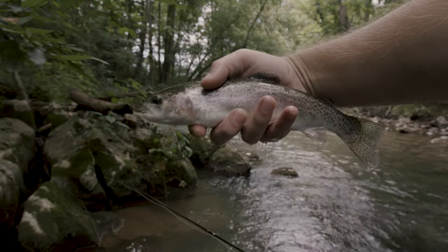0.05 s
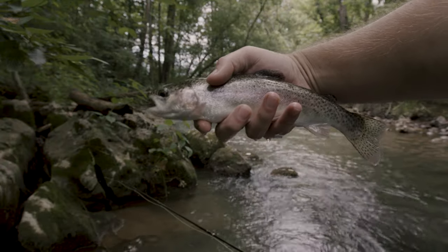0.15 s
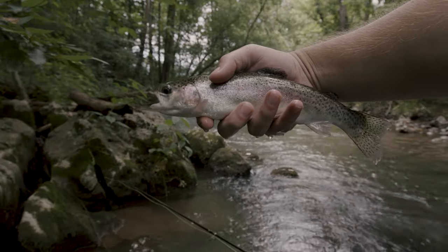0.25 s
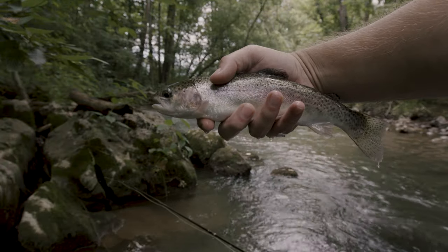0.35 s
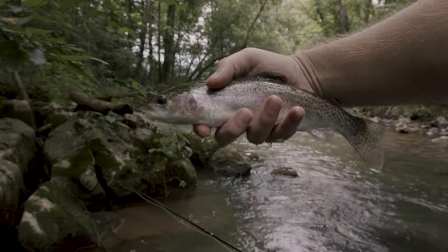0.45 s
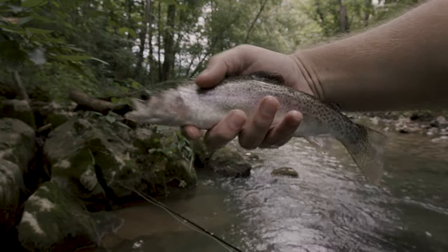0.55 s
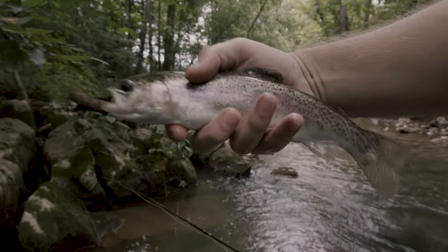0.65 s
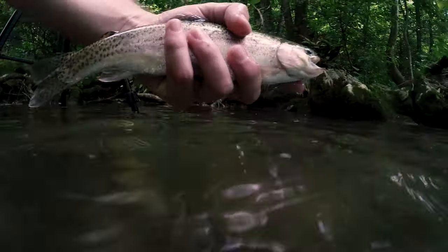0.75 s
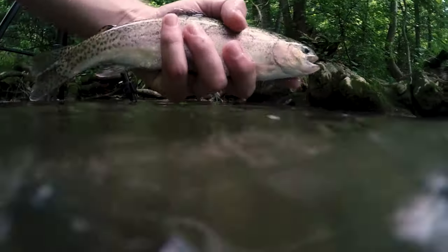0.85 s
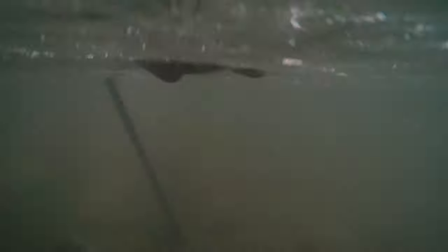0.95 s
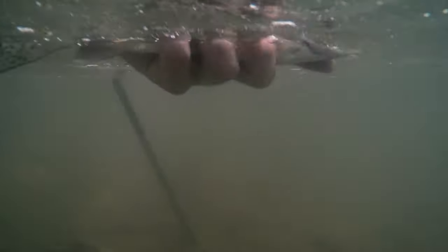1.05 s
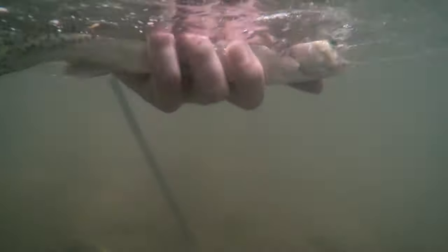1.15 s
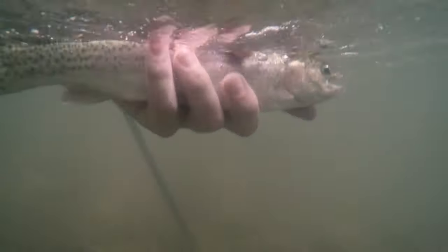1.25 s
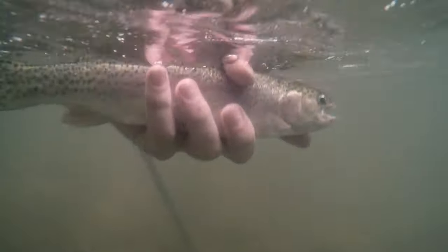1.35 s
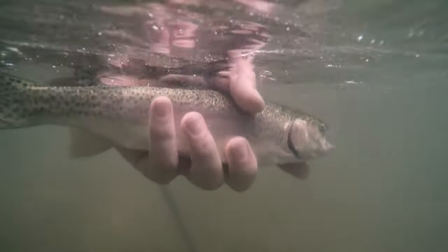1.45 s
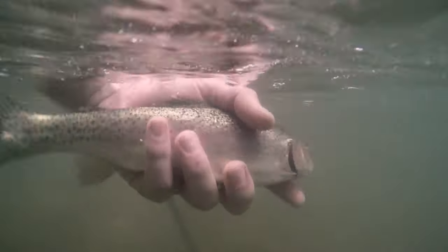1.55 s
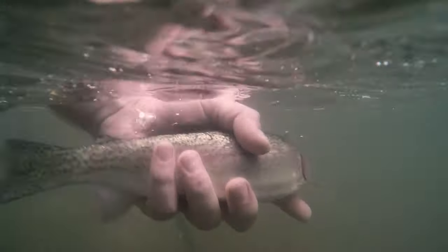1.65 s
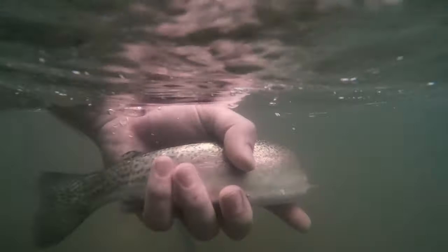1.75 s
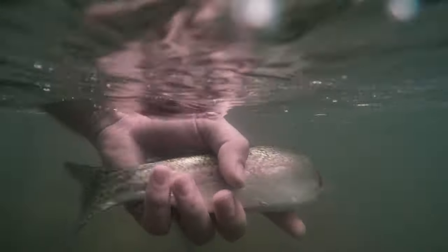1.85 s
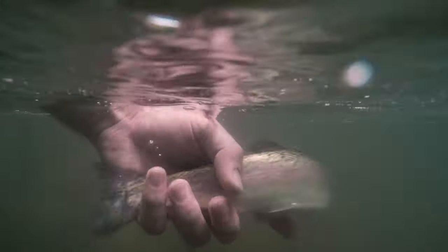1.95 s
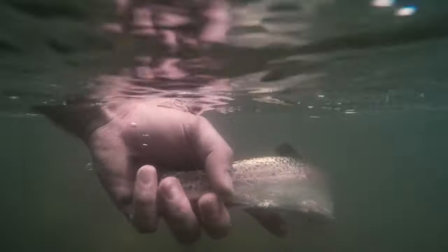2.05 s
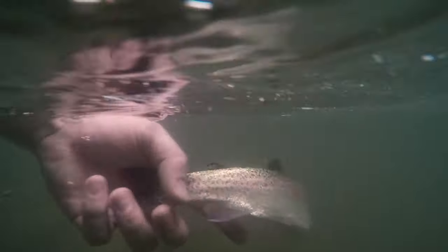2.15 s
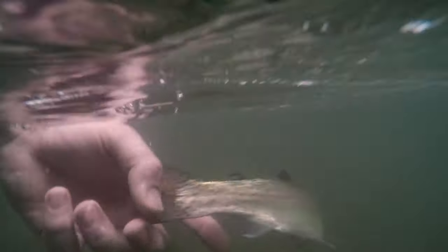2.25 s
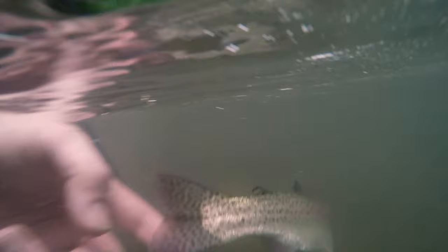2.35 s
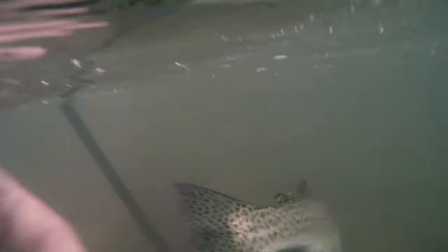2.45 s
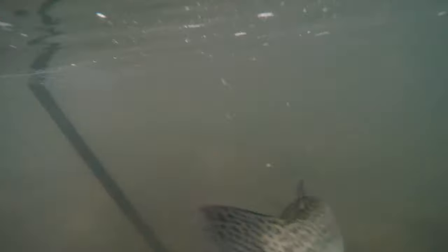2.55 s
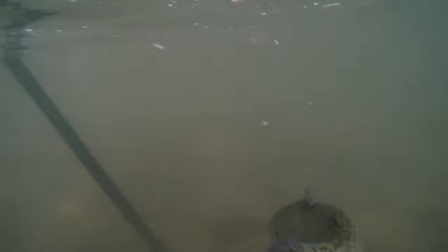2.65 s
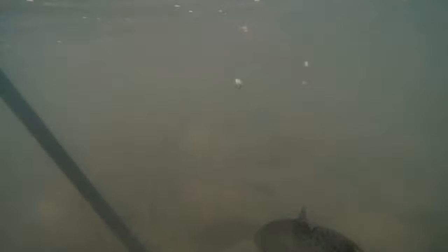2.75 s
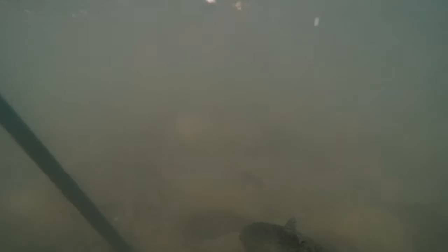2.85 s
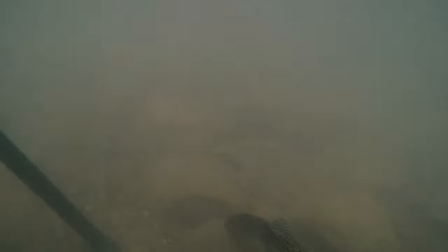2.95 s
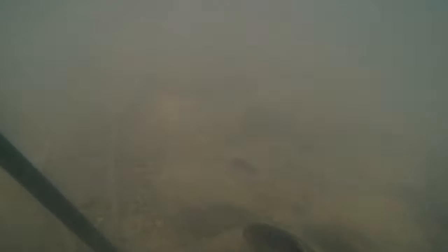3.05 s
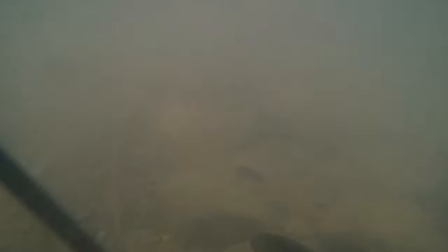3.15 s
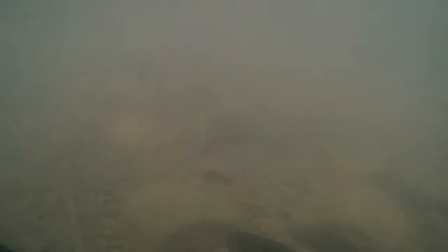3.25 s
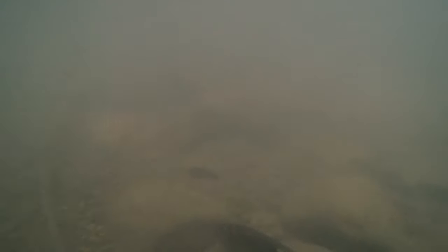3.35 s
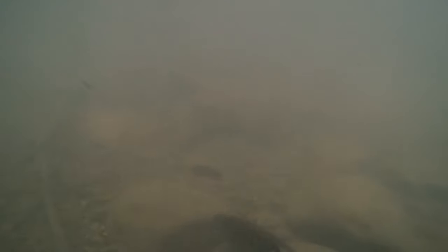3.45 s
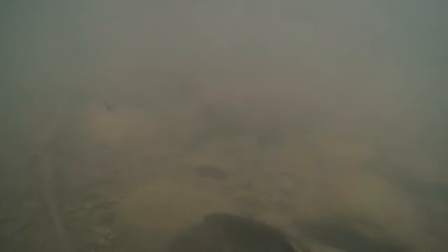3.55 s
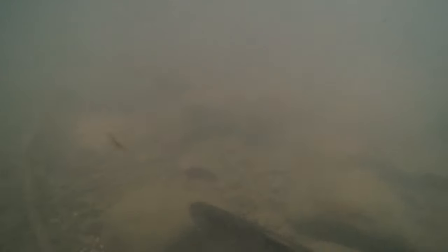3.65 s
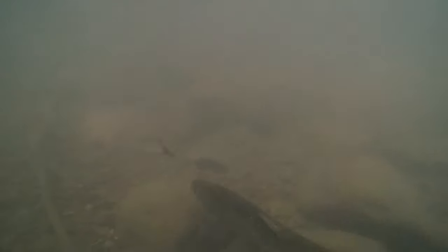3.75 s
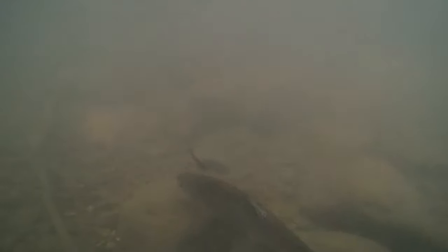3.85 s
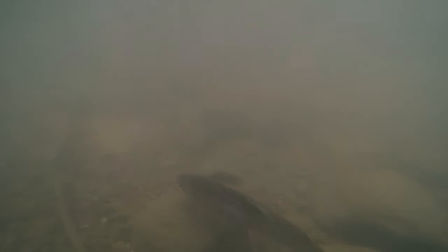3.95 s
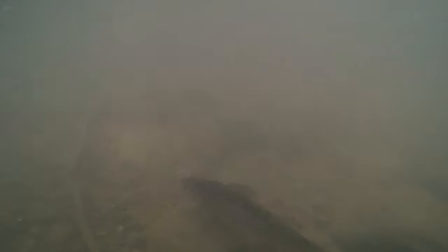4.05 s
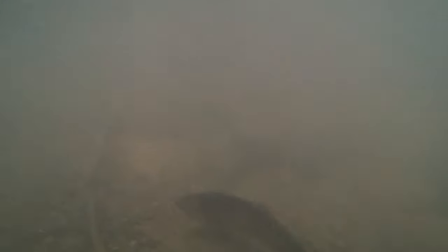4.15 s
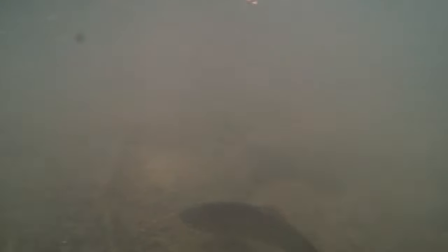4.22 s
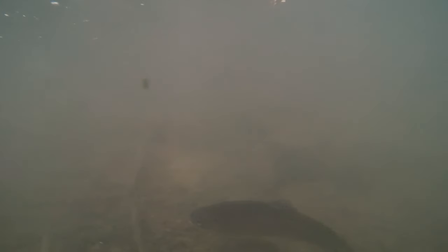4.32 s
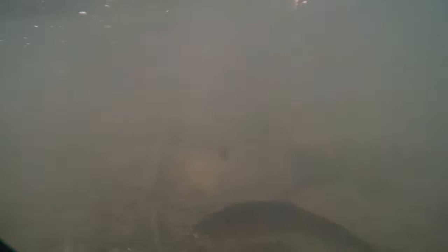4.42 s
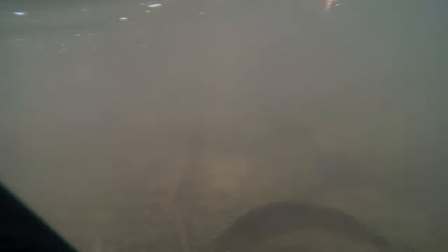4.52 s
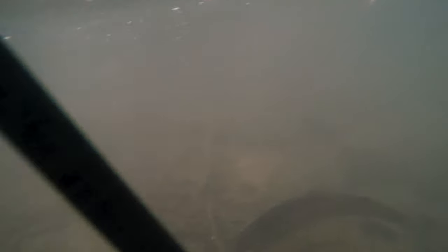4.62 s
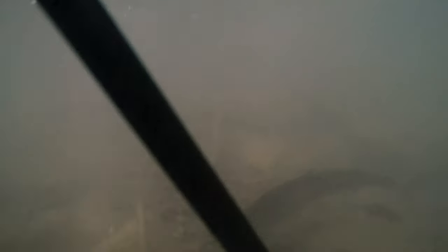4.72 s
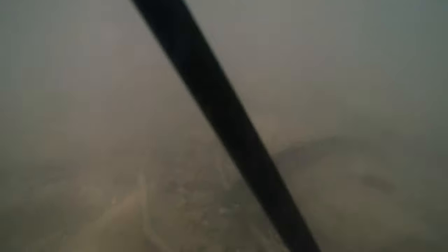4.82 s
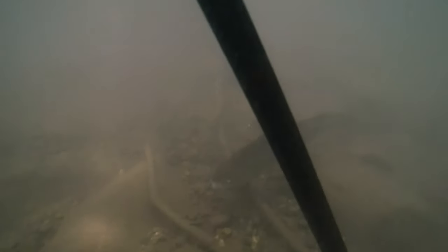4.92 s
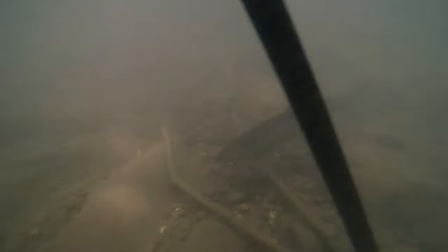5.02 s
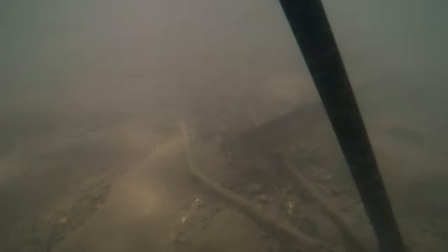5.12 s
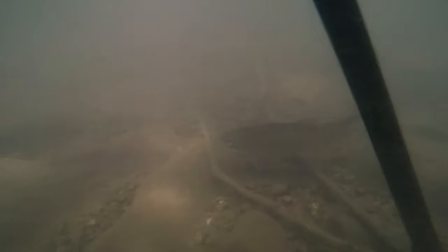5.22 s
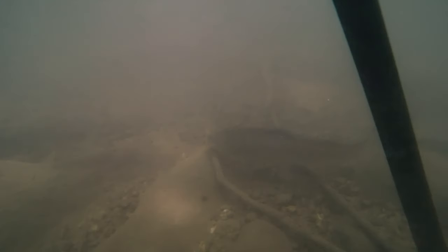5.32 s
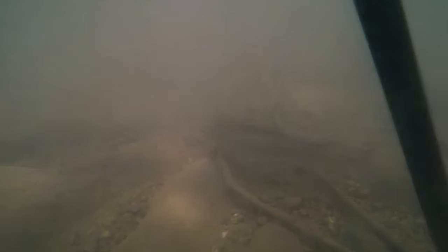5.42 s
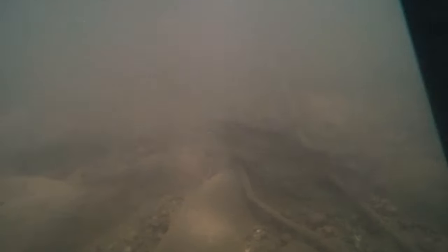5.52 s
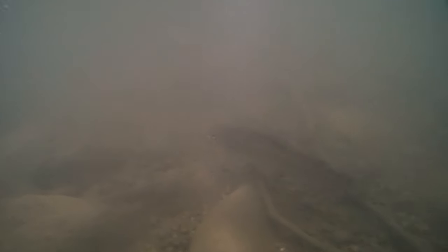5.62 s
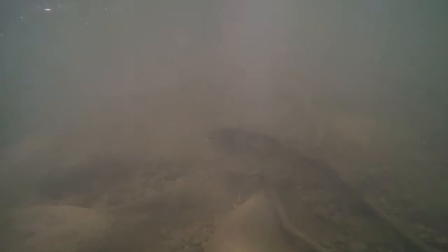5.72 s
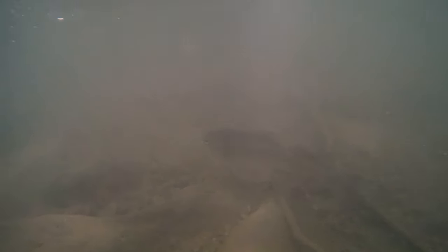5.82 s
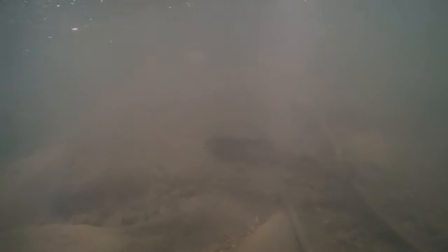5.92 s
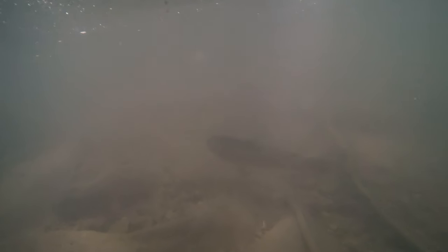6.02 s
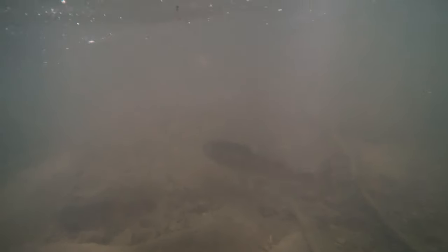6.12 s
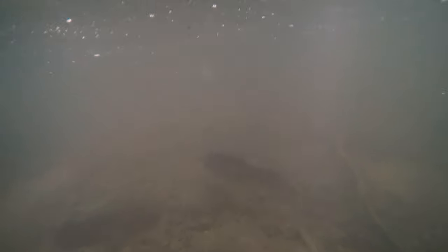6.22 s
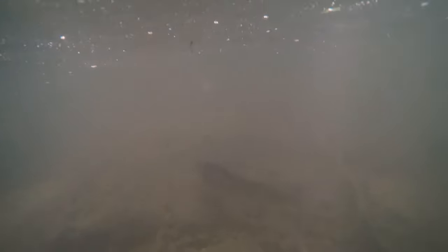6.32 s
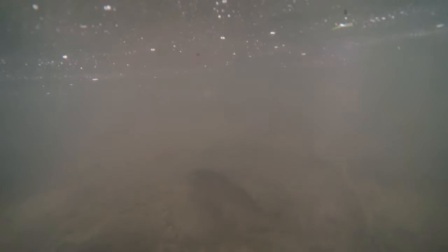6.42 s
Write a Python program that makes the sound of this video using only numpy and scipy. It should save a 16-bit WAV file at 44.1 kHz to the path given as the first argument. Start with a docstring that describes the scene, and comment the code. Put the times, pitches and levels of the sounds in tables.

```python
"""A shallow stream hisses wide in the open air; then a sealed camera goes under water and hears in mono.
Short decaying sines ring out, mostly bubbles of trapped air breaking off, among sharp cracks of bright noise.
Pops and knocks ring the housing through resonant modes, and small bubbles murmur as clumps of random rings.
The current buffets it with a lumpy low-noise rumble, over swash, hum, crackle and a muffled hiss."""
import sys
import numpy as np
from scipy import signal
from scipy.io import wavfile
from scipy.ndimage import uniform_filter1d

SR = 44100
rng = np.random.default_rng(int(sys.argv[2]) if len(sys.argv) > 2 else 0)


def unload_audio(sound):
    """Save the sound as a 16-bit wav file, at the path given as the first command line argument."""
    columns = np.transpose(np.atleast_2d(sound))
    # keep every value between -1 and 1, then stretch to whole-number steps
    steps = np.round(np.clip(columns, -1, 1) * 32767)
    wavfile.write(sys.argv[1], SR, steps.astype(np.int16))


def gain_from_decibels(decibels):
    """Convert decibel values to linear amplitude factors."""
    exponent = np.asarray(decibels, float) / 20
    return 10 ** exponent


N = 285768

# Short ringing tones: mostly bubble pops, with some thumps and long shell tails. Each row: time in seconds,
# level in dB before flutter, starting pitch in Hz, time to fall 60 dB in seconds.
RINGING_TONES = [(.767, -27.5, 290, .05), (0.809, -5.5, 1670, 0.013), (.8159, -17, 1920, .022),
                 (.842, -12.5, 2470, 0.0061), (0.841, -12, 3730, 0.017), (.8582, -30, 5530, .0082),
                 (.868, -19.5, 533, 0.02), (0.8681, -11, 6430, 0.0044), (.8718, -23, 708, 0.052),
                 (.874, -15.5, 2000, 0.022), (.878, -17.5, 3700, 0.0041), (0.8864, -21, 5500, .0067),
                 (.903, -26, 1580, 0.027), (.905, -10, 2600, .0058), (0.905, -11.5, 1000, 0.008),
                 (0.9242, -19.5, 1060, 0.035), (.931, -3.5, 2254, 0.0086), (.9315, -8, 3200, 0.0011),
                 (0.9331, -5, 4540, 0.014), (.9589, -18, 6830, .0071), (0.9981, -18, 2030, 0.0077),
                 (1.0214, -10, 4600, 0.0034), (1.0233, -1.5, 3590, 0.0074), (1.0656, -11.5, 870, 0.007),
                 (1.066, -19.5, 307, 0.027), (1.0698, -27.5, 1580, 0.024), (1.0807, -25.5, 710, 0.047),
                 (1.0882, -18, 640, 0.0066), (1.0895, -15.5, 4100, 0.0081), (1.113, -16.5, 3560, 0.006),
                 (1.12, -10, 3400, 0.0039), (1.12, -6.5, 5830, 0.0014), (1.126, -20.5, 1790, 0.012),
                 (1.1353, -17, 3300, .0022), (1.1371, -18, 5140, 0.0059), (1.142, -10, 1710, 0.012),
                 (1.1415, -11, 9700, 0.0051), (1.142, -11.5, 5800, 0.006), (1.146, -26.5, 300, .03),
                 (1.1466, -13.5, 565, 0.03), (1.1501, -11, 3450, .003), (1.163, -18, 1938, 0.0055),
                 (1.1651, -12, 3260, .0042), (1.1705, -15, 4535, .005), (1.176, -28, 1530, 0.018),
                 (1.1892, -8, 3680, .0054), (1.1895, -15.5, 1440, .011), (1.1942, -7.5, 1413, .011),
                 (1.1941, 1.5, 3425, .007), (1.194, -4.5, 7520, 0.0059), (1.209, -26, 1804, 0.046),
                 (1.2118, -22, 3670, .0066), (1.2279, -19.5, 4700, 0.013), (1.2285, -29, 3100, 0.012),
                 (1.2434, -29.5, 540, 0.011), (1.245, -23, 1590, .037), (1.26, -20.5, 1760, 0.013),
                 (1.268, -51, 1823, 0.24), (1.2952, -43.5, 625, 0.033), (1.3785, -45.5, 2390, 0.014),
                 (1.4485, -45.5, 2405, .013), (1.5614, -35, 2800, .006), (1.6699, -30, 2760, 0.005),
                 (1.6943, -29, 2560, 0.025), (1.7057, -33.5, 920, 0.0074), (1.7075, -29.5, 556, 0.035),
                 (1.7291, -32, 3360, 0.018), (1.8879, -33, 2170, .005), (1.89, -33, 3530, 0.0078),
                 (1.9776, -33, 480, 0.019), (1.978, -25, 3220, 0.0017), (1.997, -31, 577, 0.034),
                 (1.999, -33, 3780, .017), (2.1194, -38.5, 3920, 0.017), (2.203, -32.5, 1570, .0077),
                 (2.2032, -27.5, 3970, .012), (2.252, -3.5, 660, 0.0067), (2.2522, 0.5, 1182, 0.019),
                 (2.253, -9.5, 1550, .019), (2.271, -8, 1030, 0.011), (2.2812, -15, 2294, 0.023),
                 (2.2799, -14.5, 3390, 0.017), (2.2808, -14, 9800, 0.0053), (2.2987, -20, 2700, 0.025),
                 (2.308, -24, 3360, .004), (2.3361, -12, 1626, 0.023), (2.337, -17.5, 3560, 0.016),
                 (2.3448, -12, 1730, 0.018), (2.35, -40.5, 1730, 0.6), (2.389, -13, 1950, 0.021),
                 (2.394, -17.5, 2400, 0.011), (2.4058, -30, 910, 0.057), (2.4099, -29, 456, .032),
                 (2.4574, -25.5, 664, .021), (2.4584, -18, 2290, 0.0053), (2.4708, -14.5, 633, 0.013),
                 (2.4717, -18, 2580, 0.017), (2.4722, -20.5, 3340, 0.022), (2.472, -16.5, 3830, 0.0067),
                 (2.4893, -21, 574, 0.0064), (2.4975, -23, 3550, 0.027), (2.511, -7, 553, 0.0025),
                 (2.5107, -5, 1682, 0.026), (2.519, -33, 1835, 0.079), (2.569, -33.5, 3370, 0.019),
                 (2.5749, -30.5, 610, .012), (2.5849, -36, 3400, .021), (2.5997, -25.5, 2310, 0.0019),
                 (2.614, -35, 1360, .008), (2.6507, -21, 3600, 0.0032), (2.6515, -26, 2190, 0.05),
                 (2.696, -27, 2840, .012), (2.7094, -19.5, 560, 0.0029), (2.709, -16.5, 2470, 0.019),
                 (2.7436, -20.5, 4500, 0.003), (2.7447, -31, 2700, .013), (2.7605, -26, 1300, .011),
                 (2.761, -20, 2540, 0.0057), (2.771, -36, 2300, 0.019), (2.7945, -21, 4580, 0.014),
                 (2.796, -30, 1590, .025), (2.8371, -34.5, 2150, 0.052), (2.8588, -31.5, 545, 0.012),
                 (2.859, -23, 2420, .0079), (2.8692, -30, 2000, .006), (2.8766, -16.5, 3420, 0.0049),
                 (2.8763, -11.5, 1940, 0.0047), (2.9687, -32.5, 620, .017), (3.0167, -15, 1080, 0.0047),
                 (3.0167, -16, 568, 0.012), (3.1368, -25, 570, 0.046), (3.1416, -17, 4900, 0.0028),
                 (3.143, -22, 6030, 0.0053), (3.143, -16.5, 3160, 0.0025), (3.185, -30, 1452, .083),
                 (3.1953, -9.5, 572, 0.02), (3.1975, -25, 3270, 0.013), (3.198, -22, 2595, 0.035),
                 (3.2041, -22, 1490, .037), (3.2097, -32, 896, 0.024), (3.213, -31, 458, 0.047),
                 (3.2547, -30, 2920, 0.0028), (3.2617, -28.5, 2200, .006), (3.263, -32, 906, .032),
                 (3.619, -42, 1340, 0.034), (3.6304, -38, 1580, 0.049), (3.6466, -35, 1880, .052),
                 (3.666, -38, 1770, .051), (3.6839, -35.5, 621, 0.063), (3.6832, -38, 1653, 0.015),
                 (3.929, -47, 2215, 0.0083), (3.9675, -40, 2534, 0.028), (4.2107, -46, 2610, 0.028),
                 (4.2935, -37, 3186, 0.0089), (4.5367, -41.5, 3110, 0.021), (4.7268, -26.5, 2315, 0.0091),
                 (4.7267, -40, 3590, 0.0031), (4.727, -11.5, 1650, 0.0096), (4.737, -47, 1790, .072),
                 (4.772, -21, 937, 0.025), (4.7728, -23, 1484, 0.018), (4.792, -19, 1513, 0.021),
                 (4.7932, -25, 1157, 0.028), (4.879, -49.5, 1560, 0.048), (4.994, -39.5, 540, 0.011),
                 (5.0926, -41.5, 3320, .024), (5.1115, -45, 3840, .012), (5.1295, -40, 1573, 0.048),
                 (5.3373, -44.5, 2227, 0.052), (5.4222, -47.5, 3240, 0.021), (5.6278, -41, 3310, .013),
                 (5.6452, -40, 2550, 0.041), (5.7322, -28, 1867, 0.05), (5.7377, -40, 1777, .03),
                 (5.9095, -28.5, 2284, 0.022), (5.989, -43.5, 2350, 0.021), (6.069, -48, 1586, .05),
                 (6.1552, -44, 1810, .061), (6.2474, -42, 520, 0.0075), (6.2833, -43, 2007, 0.026),
                 (6.4717, -37, 2500, .022)]
# Bright cracks. Each row: start in seconds, level in dB before the envelope, top octave in dB relative to that.
CRACKS = [(.8074, -33.5, -7), (0.816, -29.5, -10.5), (0.843, -42.5, -30), (.847, -44, -10),
          (.8578, -44, -29), (.8617, -46, -16), (0.87, -18.5, -26), (0.8734, -29, -13), (0.88, -33, -20),
          (.886, -36, -18), (0.8984, -32, -10.5), (.903, -46.5, -6), (.9235, -38, -38), (.932, -36, -5),
          (0.9613, -27.5, -31), (.9832, -49, -10.5), (0.9987, -23.5, -1), (1.022, -36.5, -15.5),
          (1.053, -50, -10), (1.0853, -32.5, 0.5), (1.105, -43, -4.5), (1.1115, -29, -3.5),
          (1.1193, -22.5, -17.5), (1.1264, -30.5, -26), (1.1355, -36, -5.5), (1.1416, -8, -17.5),
          (1.1493, -24.5, -14), (1.1598, -28.5, -14.5), (1.1664, -42.5, -14.5), (1.17, -36, -19.5),
          (1.1773, -30, -30.5), (1.1889, -4, -25), (1.1937, -11, -11.5), (1.228, -40.5, -9.5),
          (1.2335, -50, -20), (1.9767, -39.5, -15), (2.075, -33.5, -13), (2.2523, -32.5, -6.5),
          (2.2839, -9.5, -31), (2.3075, -15, -20.5), (2.4575, -42, -26), (2.4673, -15, -19.5),
          (2.4717, -9, -29), (2.4891, -53.5, -2.5), (2.512, -28, -26.5), (2.577, -50, -15),
          (2.654, -26.5, -31), (2.695, -33.5, -26), (2.708, -43.5, -5), (2.744, -34, -6),
          (2.7602, -31.5, 10), (2.7945, -46, -12), (2.859, -40, 6.5), (2.875, -29.5, -22),
          (3.1424, -30.5, -30.5), (4.0961, -37, -20.5)]
# Knocks on the housing. Each row: start in seconds, level of the push in dB, pitch of the push in Hz,
# level of the click in dB before it is softened.
KNOCKS = [(0.807, -22, 45.5, -42), (0.898, -26, 73.5, -37), (1.065, -49, 112, -30.5),
          (1.143, -28.5, 80.5, -28), (1.247, -38, 110, -40.5), (1.751, -46, 71, -47),
          (1.97, -26.5, 80, -41), (2.252, -16.5, 69.4, -27.5), (2.381, -19, 69.4, -23),
          (2.467, -19.5, 67.6, -19.5), (2.511, -22, 120, -28.5), (2.758, -37, 70.6, -28),
          (3.11, -28, 77.5, -27), (3.2608, -4, 52, -30), (3.609, -22, 69.3, -36),
          (3.674, -31.5, 69.5, -33.5), (4.03, -40, 100, -46), (4.162, -43, 109, -49.5),
          (4.883, -24, 111.2, -37.5), (5.24, -34.5, 81.3, -45.5), (5.738, -38.5, 89.5, -48),
          (6.032, -40, 90, -44.5), (6.136, -40.5, 110, -45), (6.246, -39, 108, -45)]
# Ringing modes of the shell. Each row: pitch in Hz, level in dB, time to fall 60 dB in seconds.
HOUSING_MODES = [(218, -4, .3), (554, -6, .04), (640, -8, .03), (1570, -8, .06), (1750, -6, .08),
                 (2230, -4, .04), (2540, -6, .04), (3300, -8, .04), (4500, -16, .03), (5630, -20, .03)]
# Peaks of the low rumble's level. Each row: time in seconds, level in dB.
RUMBLE_PEAKS = [(.83, -27.5), (1.09, -30), (1.29, -34), (1.45, -31), (1.59, -33), (1.79, -31), (1.98, -40),
                (2.12, -35), (2.27, -27), (2.4, -30), (2.53, -32), (2.71, -25), (2.83, -25.5),
                (3.05, -18.5), (3.18, -20.5), (3.31, -19.5), (3.45, -24.5), (3.65, -29.5), (3.77, -26),
                (4.01, -28.5), (4.17, -30), (4.35, -27), (4.49, -28.5), (4.62, -28.5), (4.79, -26.5),
                (4.91, -26.5), (5.07, -28.5), (5.23, -30.5), (5.49, -31.5), (5.71, -30.5), (5.95, -28.5),
                (6.1, -33.5), (6.26, -33), (6.41, -28.5)]
# Fine air stirred into the water, as the level of its murmur. Each row: time in seconds, level in dB.
STIR = [(.81, -36), (.97, -66.5), (1.12, -47.5), (1.31, -71), (1.63, -61), (1.73, -55.5), (1.85, -62.5),
        (2.0, -57.5), (2.16, -61), (2.3, -52), (2.61, -50), (3.01, -52.5), (3.12, -58.5), (3.24, -55.5),
        (3.36, -62), (3.6, -66), (3.63, -58), (3.7, -58.5), (3.76, -67.5), (3.87, -63.5), (4.69, -69),
        (5.11, -60), (5.6, -64), (6.48, -66)]
# Muffled colour of the underwater sound. Each row: frequency in Hz, relative level in dB per Hz.
MUFFLED_COLOUR = [(88, -32.5), (150, -5.5), (209, -7.5), (303, -22.5), (545, -10.5), (998, -26),
                  (1360, -24.5), (1500, -19), (1660, -23.5), (1870, -21), (2360, -18), (4160, -26),
                  (11700, -33.5), (14500, -38.5), (16000, -64)]
# Colour of the stream in air. Each row: frequency in Hz, relative level in dB per Hz.
STREAM_COLOUR = [(18, -47), (30, -0.5), (81, -5.5), (157, -18.5), (239, -10), (336, -4), (526, -5),
                 (616, -0.5), (760, -4.5), (1040, -0.5), (1630, -3), (3490, -8), (5450, -16.5), (9970, -35),
                 (16000, -31)]
# Stereo width of the stream. Each row: frequency in Hz, left-right likeness from -1 to 1.
STREAM_LIKENESS = [(60, 0.95), (150, 1), (380, 0.84), (950, -0.12), (2380, -0.14), (5980, 0.096),
                   (15000, 0.11)]
# Stereo balance of the stream. Each row: frequency in Hz, left minus right in dB.
STREAM_LEAN = [(60, 0.5), (150, -2.5), (380, 0.5), (950, -3), (2380, -6), (5980, 0), (15000, -2)]

DIVE_S = 0.81
CUTOFF_HZ = 16700
CALM_DB = -66   # stir of quiet water
LOW_TONE_BELOW_HZ = 1300   # splits the ringing tones into low and high ones


def rms_one(x):
    """Scale to rms 1."""
    return x / np.sqrt(np.mean(x ** 2) + 1e-20)


def at_hz(points, hz):
    """Read a curve on a log-frequency axis."""
    point_hz, values = np.transpose(points)
    return np.interp(np.log(hz), np.log(point_hz), values)


def drift(rate_hz):
    """Slow random wander of spread 1, low-passed noise made at every 40th sample."""
    pole = np.exp(-80 * np.pi * rate_hz / SR)
    white = rng.standard_normal(N // 40 + 2002)
    slow = signal.lfilter([1], [1, -2 * pole, pole * pole], white)[2000:]
    return np.interp(np.arange(N) / 40, np.arange(len(slow)), rms_one(slow))


def band(x, low_hz, high_hz, order=2):
    """Butterworth band-pass."""
    edges_hz = [low_hz, min(high_hz, 0.45 * SR)]
    return signal.sosfilt(signal.butter(order, edges_hz, "band", fs=SR, output="sos"), x)


def ring(clicks, hz, t60):
    """Two-pole resonator: a unit click sets a decaying sine ringing from height 1."""
    pole, w = gain_from_decibels(-60 / (t60 * SR)), 2 * np.pi * hz / SR
    return signal.lfilter([0, np.sin(w)], [1, -2 * pole * np.cos(w), pole * pole], clicks + 1e-18)


def trail(events, offset_db, rise_db_per_s, fall_db_per_s):
    """Gain that climbs to each event (time, dB) and falls away after it at steady rates in dB."""
    t = np.arange(0, N + 64, 64) / SR
    s, db = np.transpose(events)[:, :, None]
    distance_db = np.where(t < s, rise_db_per_s * (s - t), fall_db_per_s * (t - s))
    loudest = np.max(db - distance_db, axis=0)
    return np.interp(np.arange(N) / SR, t, gain_from_decibels(offset_db + loudest))


def banded_noise(colour, patchy_db, length, wide):
    """Third-octave bands of noise, each with its own level and flicker; left and right differ if wide."""
    out, edges = 0, 28 * 2 ** np.arange(0, 9.4, 1 / 3)
    white = rng.standard_normal((2, 2, length))   # neighbouring bands take turns between two noises
    together = drift(0.99)[:length]
    for k, (low, high) in enumerate(zip(edges, edges[1:])):
        hz = np.sqrt(low * high)
        flicker = 0.4 * together + drift(15)[:length]
        gain = gain_from_decibels(at_hz(colour, hz) + patchy_db * flicker)
        if wide:
            mid, side = band(white[k % 2], low, high)
            alike = np.clip(at_hz(STREAM_LIKENESS, hz), -1, 1)
            lean = gain_from_decibels(at_hz(STREAM_LEAN, hz) * np.array([[0.5], [-0.5]]))
            pair = np.sqrt(1 + alike) * mid + np.sqrt(1 - alike) * side * [[1], [-1]]
            out = out + gain * lean * pair
        else:
            out = out + gain * band(white[k % 2, 0], low, high)
    return rms_one(out)


def ringing_tones(rise=0.0058, flutter=0.4):
    """Each tone swells over about two cycles, rings down unevenly and rises a little in pitch."""
    out = np.zeros(N + SR)
    uneven = 1 + flutter * rms_one(band(rng.standard_normal(N), 170, 800, order=4))
    for s, db, hz, t60 in RINGING_TONES:
        swell_s = 2.3 / hz
        t = np.arange(int((1.3 * t60 + swell_s) * SR)) / SR
        attack = np.sin(np.pi / 2 * np.minimum(t / swell_s, 1)) ** 2
        shape = attack * gain_from_decibels(-60 * np.maximum(t - 0.7 * swell_s, 0) / t60)
        tone = np.sin(2 * np.pi * hz * (t + rise * t ** 2 / (2 * t60)))
        out[round((s - 0.3 * swell_s) * SR):][:len(t)] += gain_from_decibels(db) * shape / shape.max() * tone
    return out[:N] * uneven


def cracks(low_hz=2600, split_hz=11000, rise_s=0.00047, t60=0.0048):
    """Bursts of bright noise a few milliseconds long, with the top octave levelled on its own."""
    body, top = np.zeros((2, N + SR))
    t = np.arange(1200) / SR
    shape = gain_from_decibels(-60 * t / t60) * np.minimum(t / rise_s, 1)
    for s, db, top_db in CRACKS:
        body[round(s * SR):][:len(t)] += shape * gain_from_decibels(db)
        top[round(s * SR):][:len(t)] += shape * gain_from_decibels(db + top_db)
    white = rng.standard_normal((2, N))
    body_noise = rms_one(band(white[0], low_hz, split_hz))
    top_noise = rms_one(band(white[1], split_hz, CUTOFF_HZ))
    return body[:N] * body_noise + top[:N] * top_noise


def wake(pops, level_db=-18, t60=0.01, dull_hz=4500):
    """Nearby bubbles and the stream bed scatter each pop into a short, duller, rough tail."""
    t = np.arange(int(0.08 * SR)) / SR
    scatter = rng.standard_normal(len(t)) * gain_from_decibels(-60 * t / t60) * np.minimum(t / 0.0045, 1)
    scatter = scatter / np.sqrt(np.sum(scatter ** 2))
    tail = signal.fftconvolve(pops, scatter)[:N]
    return gain_from_decibels(level_db) * band(tail, 220, dull_hz)


def knocks(contact_hz=450):
    """A knock is one low push of water and a soft click into the shell."""
    push, clicks = np.zeros(N + SR), np.zeros(N)
    for s, db, hz, click_db in KNOCKS:
        cycles = np.arange(int(3 * SR / hz)) * hz / SR
        shape = 6 * cycles * np.exp(-2.3 * cycles)
        push[round(s * SR):][:len(cycles)] -= gain_from_decibels(db) * shape * np.sin(2 * np.pi * cycles)
        clicks[round(s * SR)] = gain_from_decibels(click_db)
    soft = signal.sosfilt(signal.butter(2, contact_hz, fs=SR, output="sos"), clicks)
    return push[:N] + housing(soft)


def housing(blows):
    """The shell rings at its modes whatever strikes it; the modes alternate in sign."""
    out = 0
    for k, (hz, db, t60) in enumerate(HOUSING_MODES):
        out = out + gain_from_decibels(db) * ring(blows, hz, t60) * (-1) ** k
    return out


def current():
    """Moving water presses on the ports, and stirred-in air swings the level of most layers, in dB."""
    t = np.arange(N) / SR
    stir_db = np.interp(t, *np.transpose(STIR))
    swing_db = stir_db - CALM_DB
    low = rumble(swing_db) + swash(swing_db) + hum(swing_db)
    fine = gurgle(swing_db) + murmur(stir_db) + crackle(swing_db)
    return (low + fine + muffled_hiss()) * (t > DIVE_S)


def rumble(swing_db, quiet_db=-40, follows=0.15):
    """Low noise, evened out so that its listed level peaks shape it."""
    low = band(rng.standard_normal(N), 22, 41)
    power = uniform_filter1d(low ** 2, size=3000)
    even = rms_one(low / np.sqrt(power + 0.1 * low.var()))
    peaks = trail(RUMBLE_PEAKS, offset_db=0, rise_db_per_s=140, fall_db_per_s=140)
    return even * np.maximum(gain_from_decibels(quiet_db + follows * swing_db), peaks)


def swash(swing_db, quiet_db=-60, follows=0.6):
    """Gently wavering low noise that swells around the click of each knock."""
    clicks = np.array(KNOCKS)[:, ::3]
    around = trail(clicks, offset_db=-8.5, rise_db_per_s=400, fall_db_per_s=188)
    noise = rms_one(band(rng.standard_normal(N), 48, 160)) * gain_from_decibels(0.83 * drift(42))
    return noise * (gain_from_decibels(quiet_db + follows * swing_db) + around)


def hum(swing_db, quiet_db=-68.5, follows=0.9):
    """Noise keeps the lowest shell mode humming, louder around the click of each knock."""
    clicks = np.array(KNOCKS)[:, ::3]
    around = trail(clicks, offset_db=-7, rise_db_per_s=850, fall_db_per_s=220)
    hz, _, t60 = HOUSING_MODES[0]
    tone = rms_one(ring(band(rng.standard_normal(N), 140, 270), hz, t60))
    return tone * (gain_from_decibels(quiet_db + follows * swing_db) + around)


def gurgle(swing_db, quiet_db=-66, follows=0.51):
    """Low clumps of unseen bubbles, louder around each low ringing tone."""
    tones = np.array(RINGING_TONES)
    low_tones = tones[tones[:, 2] < LOW_TONE_BELOW_HZ, :2]
    around = trail(low_tones, offset_db=-29.5, rise_db_per_s=3600, fall_db_per_s=240)
    grains = small_bubbles(per_s=370, low_hz=304, high_hz=1240, cycles=5.9, size_db=4.5, noise_share=0.6)
    return grains * (gain_from_decibels(quiet_db + follows * swing_db) + around)


def murmur(stir_db):
    """Higher clumps of unseen bubbles and a flickering fizz, louder around each high ringing tone."""
    tones = np.array(RINGING_TONES)
    high_tones = tones[tones[:, 2] >= LOW_TONE_BELOW_HZ, :2]
    around = trail(high_tones, offset_db=-45, rise_db_per_s=4000, fall_db_per_s=610)
    grains = small_bubbles(per_s=400, low_hz=1350, high_hz=4800, cycles=40, size_db=5.5, noise_share=0.33)
    fizz = rms_one(band(rng.standard_normal(N), 3600, 5600)) * gain_from_decibels(-17 + 5 * drift(60))
    return (grains + fizz) * (gain_from_decibels(stir_db) + around)


def small_bubbles(per_s, low_hz, high_hz, cycles, size_db, noise_share):
    """Unseen bubbles in clumps, each at one pitch with a soft start, over churned water; rms 1."""
    sizes = gain_from_decibels(size_db * np.minimum(rng.exponential(1, N), 4)) * rng.choice([-1, 1], N)
    born = sizes * (rng.random(N) < per_s * gain_from_decibels(4 * drift(12)) / SR)
    dealt, out = rng.integers(0, 20, N), 0
    for k, hz in enumerate(np.geomspace(low_hz, high_hz, 20)):
        once = ring(born * (dealt == k), hz, cycles / hz)
        twice = ring(once, hz, 14 / hz)   # the second pass softens the start
        out = out + gain_from_decibels(1.2 * at_hz(MUFFLED_COLOUR, hz)) * twice * hz / low_hz
    churn = band(rng.standard_normal(N), low_hz, high_hz) * gain_from_decibels(5 * drift(38))
    shell = band(housing(churn), low_hz, high_hz)   # part of the churning is heard through the shell
    return rms_one(rms_one(out) + noise_share * (rms_one(churn) + 0.96 * rms_one(shell)))


def crackle(swing_db, low_hz=700, high_hz=4200, shell_db=-18, size_db=2.5):
    """Stray ticks, denser and louder in stirred water; each is a short snap that rings the shell."""
    born = rng.random(N) < 60 * gain_from_decibels(0.5 * swing_db) / SR   # 60 per second in quiet water
    sizes = gain_from_decibels(size_db * np.minimum(rng.exponential(1, N), 3)) * rng.choice([-1, 1], N)
    ticks = born * sizes * gain_from_decibels(-51 + 1.3 * swing_db) + 1e-18
    return band(ticks + gain_from_decibels(shell_db) * housing(ticks), low_hz, high_hz)


def muffled_hiss(level_db=-61.5, dip_db=-8, dip_s=1.24, back_s=0.2):
    """A dull noise floor that sinks through the plunge and then returns."""
    t = np.arange(N) / SR
    sinking = (t - DIVE_S) / (dip_s - DIVE_S)
    dip = np.where(t < dip_s, sinking, np.exp((dip_s - t) / back_s))
    noise = banded_noise(MUFFLED_COLOUR, patchy_db=1.0, length=N, wide=False)
    return gain_from_decibels(level_db + dip_db * dip) * noise


def stream(level_db=-31.5):
    """Dense far water: wide patchy hiss that stops as the ports go under."""
    out, length = np.zeros((2, N)), int(DIVE_S * SR)
    hiss = banded_noise(STREAM_COLOUR, patchy_db=1.45, length=length, wide=True)
    out[:, :length] = gain_from_decibels(level_db) * hiss
    return out


def scene():
    """The stream in air, wide, and one channel of the other sounds sent to both sides."""
    pops = ringing_tones() + cracks()
    shaken = gain_from_decibels(-53.5) * housing(pops)   # every pop leaves a short tail in the shell
    return pops + shaken + wake(pops) + knocks() + current() + stream()


def top_cut(x):
    """Nothing passes above the cut-off."""
    return signal.sosfilt(signal.butter(12, 16510, fs=SR, output="sos"), x)


def record(dry):
    """Peaks are rounded under a ceiling, then the top is cut."""
    rounded = dry / (1 + np.abs(dry / 0.93) ** 4) ** 0.25
    cut = signal.sosfilt(signal.cheby2(10, 70, CUTOFF_HZ, fs=SR, output="sos"), rounded)
    return top_cut(cut)


dry = scene()
out = record(dry)
unload_audio(out)
```